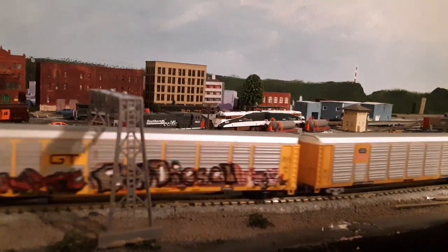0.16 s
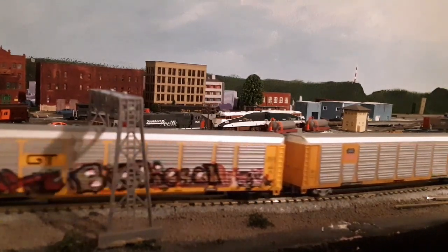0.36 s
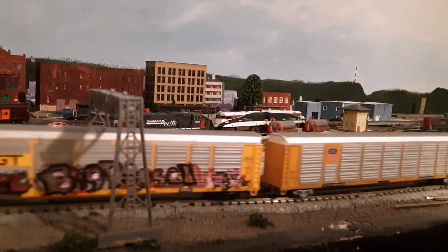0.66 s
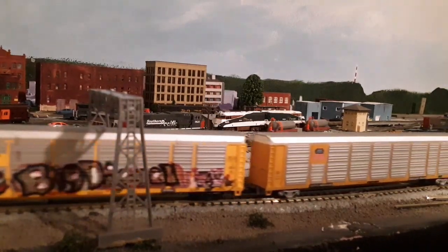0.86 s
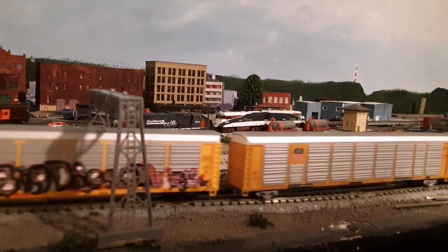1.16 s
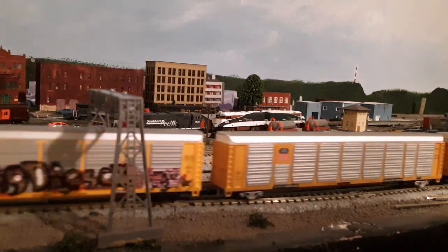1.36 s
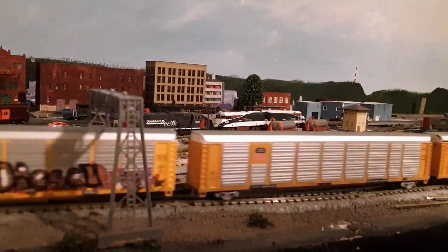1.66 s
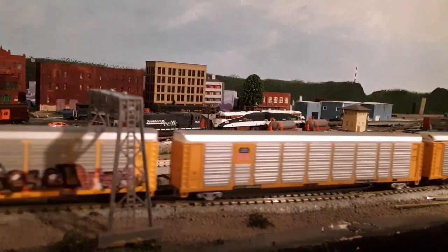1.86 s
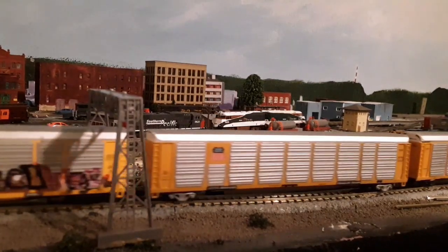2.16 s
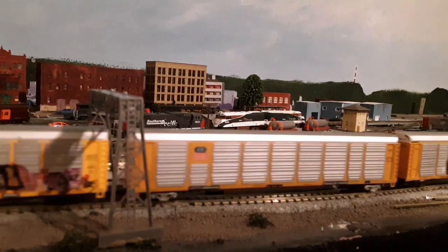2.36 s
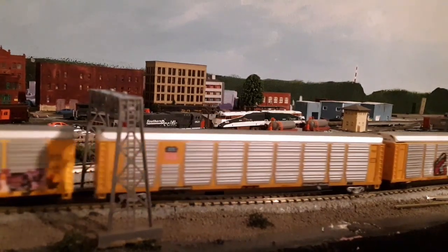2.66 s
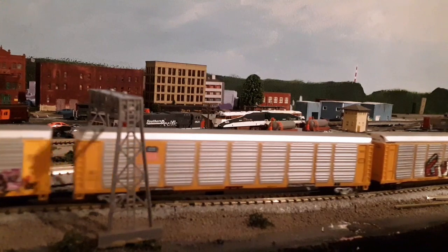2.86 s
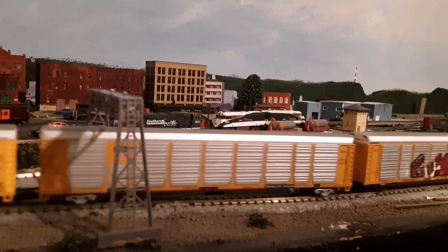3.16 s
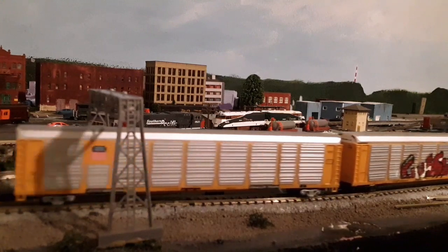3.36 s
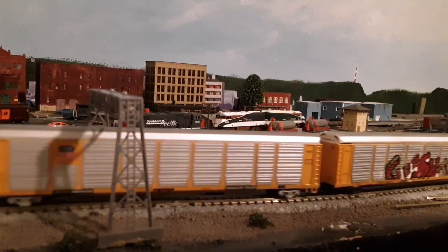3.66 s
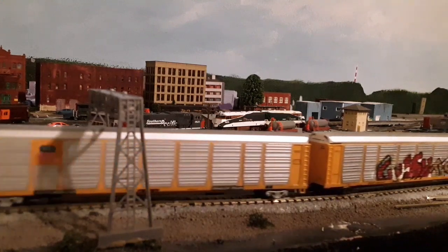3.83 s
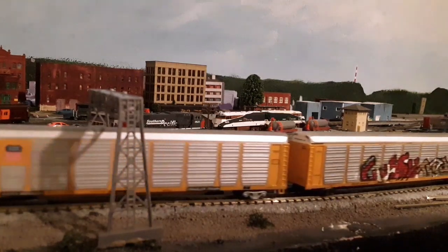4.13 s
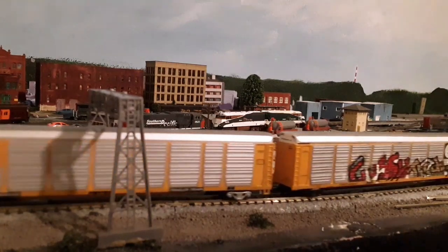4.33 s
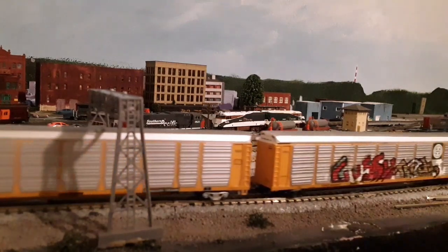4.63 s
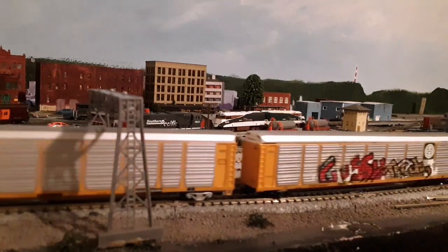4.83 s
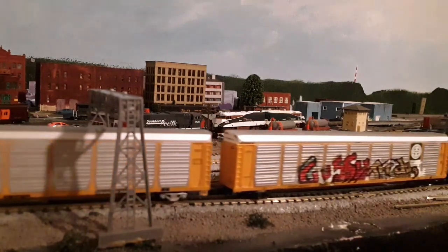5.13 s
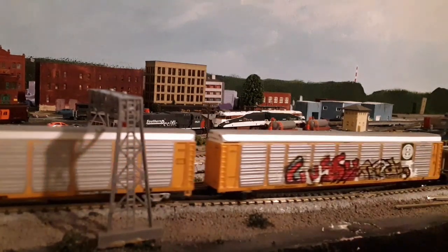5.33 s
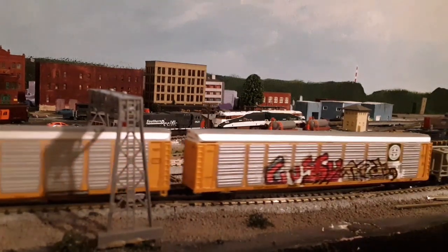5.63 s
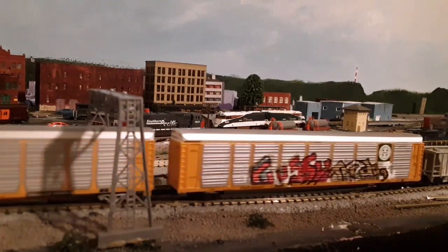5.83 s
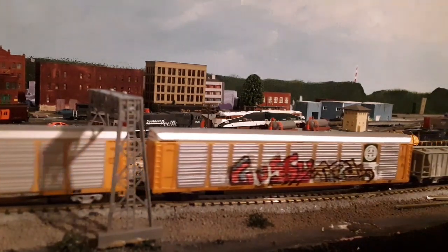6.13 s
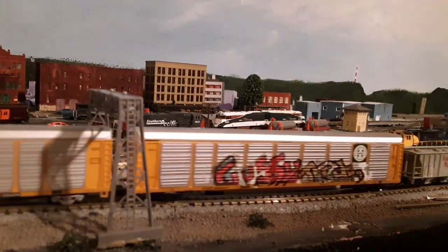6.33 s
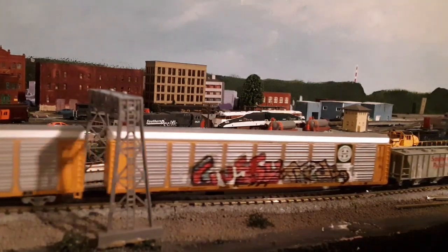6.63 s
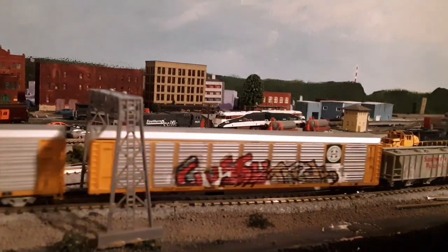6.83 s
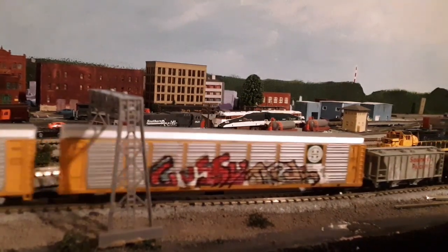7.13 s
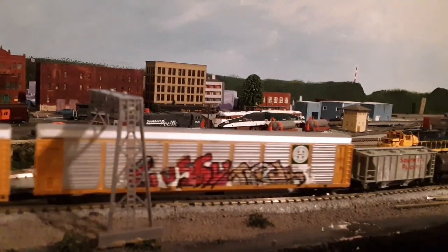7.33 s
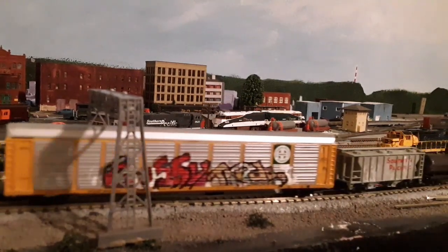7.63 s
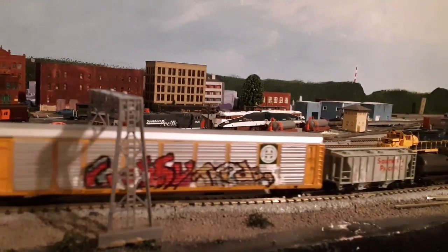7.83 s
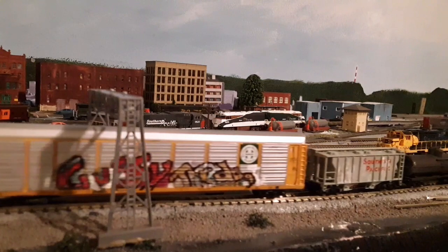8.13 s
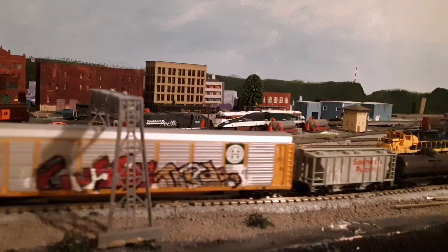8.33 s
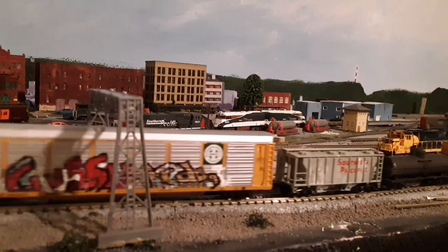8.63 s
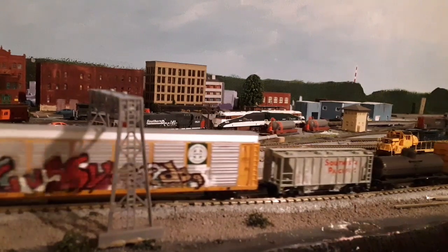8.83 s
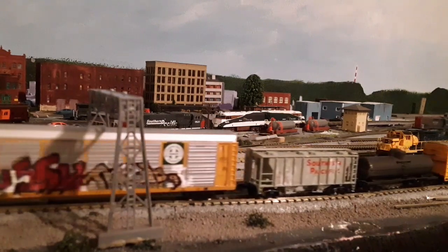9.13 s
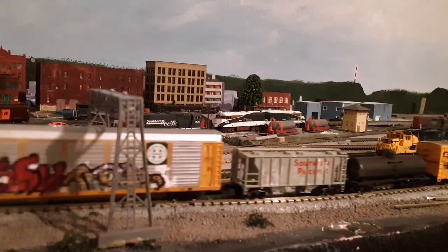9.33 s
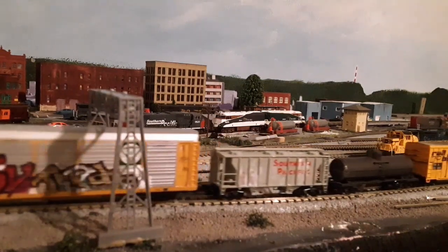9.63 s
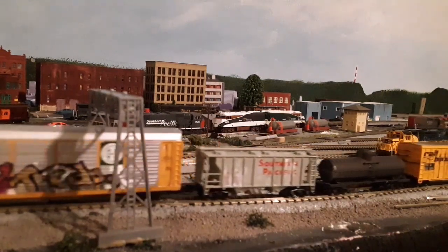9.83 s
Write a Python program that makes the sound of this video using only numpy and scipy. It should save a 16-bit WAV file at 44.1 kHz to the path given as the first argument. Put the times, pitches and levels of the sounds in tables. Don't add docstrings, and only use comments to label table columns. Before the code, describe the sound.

Small model freight cars roll by with a faint steady sizzle, light wheel ticks, and sudden sharp coupler clacks ringing briefly in a furnished room.

```python
import sys
import numpy as np
from scipy import signal
from scipy.io import wavfile
from scipy.ndimage import uniform_filter1d

SR = 44100
rng = np.random.default_rng(int(sys.argv[2]) if len(sys.argv) > 2 else 0)


def elevation(decibels):
    levels = np.asarray(decibels, float)
    return 10 ** (levels / 20)


def wav_out(sig):
    wavfile.write(sys.argv[1], SR, np.round(np.clip(np.atleast_2d(sig).T, -1, 1) * 32767).astype(np.int16))


N = 440118
SPACING = 18
EDGE_HZ = 16050
USUAL_DB = -65


def evened(x):
    return x / np.sqrt(np.mean(x ** 2) + 1e-20)


def read(points, hz):
    f, value = np.transpose(points)
    return np.interp(np.log(hz + 1), np.log(f + 1), value)


def add(mix, at, sound):
    part = mix[max(at, 0):][:len(sound)]
    part += sound[:len(part)]


def ease(t, at, span):
    return (1 + np.tanh((t - at) / span)) / 2


def circle(size=1024):
    return np.abs(np.fft.fftfreq(size, 1 / SR))


def causal(db):
    log_gain = np.log(elevation(np.maximum(db, -100)))
    return np.fft.ifft(np.exp(np.conj(signal.hilbert(log_gain)))).real


def resonate(x, hz, width):
    turn = np.exp(2j * np.pi * np.cumsum(hz * np.ones(len(x))) / SR)
    r = np.exp(-np.pi * width / SR)
    return 2 * (turn * signal.lfilter([1 - r], [1, -r], x / turn)).real


# hz, share
SHADE = [(600, 0.14), (3000, 1.5), (7000, 0.79), (15000, 1.66)]


def strikes(rows, colour):
    s, db, pan_db, treble_db, body_db, t60, room_db = np.transpose(rows)[:, :, None]
    t, hz = np.arange(2048) / SR, circle()
    near, sends = np.zeros((2, N)), np.zeros((2, N))

    chatter = rng.standard_normal((len(rows), len(t))) * elevation(-60 * t / np.maximum(t60, .002))
    chatter *= np.minimum(t / (0.0425 * t60), 1) ** 2
    chatter *= elevation(4 * np.exp(-(t / 0.0022) ** 2))

    colour_db = read(colour, hz) - 30 * (hz > EDGE_HZ)
    colour_db = colour_db + body_db * read([(2200, 1), (3000, 0)], hz)
    colour_db = colour_db + treble_db * read([(8000, 0), (9500, 1)], hz)

    def through(gains_db):
        return signal.fftconvolve(chatter, causal(gains_db), axes=1)[:, :len(t)]

    middle, click = through(colour_db), causal(colour_db)
    scale = elevation(db) / abs(middle).max(1, keepdims=True)
    shade_db = np.clip(pan_db, -4, 4) * read(SHADE, hz)
    left = scale * through(colour_db + shade_db)
    right = scale * through(colour_db - shade_db)
    energy = np.linalg.norm(middle, axis=1) / np.linalg.norm(click, axis=1)
    click *= scale * elevation(room_db) * energy[:, None]

    lag = np.clip(5 * pan_db, -SPACING, SPACING) / 2
    starts = np.round(np.hstack([s * SR - lag, s * SR + lag, s * SR])).astype(int)
    for k, (first, second, at) in enumerate(starts):
        add(near[0], first, left[k])
        add(near[1], second, right[k])
        add(sends[int(pan_db[k, 0] < 0)], at, click[k])
    return near, sends


# start_s, level_db (peak), left_right_db, treble_db, body_db
CLACKS = [(1.1583, -29, -4, -14, -5.5), (1.1798, -19, 2.5, -8.5, -14), (1.1874, -24, -1.5, 5, -3),
          (1.2062, -13.5, -1.5, -9.5, -23), (3.516, -38, -0.5, -11, -11), (3.5271, -24, 2.5, -11, -9),
          (3.5515, -14, -0.5, -6, -12), (3.5604, -36.5, -9, 2, -22), (3.5893, -11, -8, -6.5, -16.5),
          (3.5945, -17.5, -3.0, -11, -21.5), (3.6116, -19.5, 2, -28, -21)]
# start_s, level_db (peak), left_right_db, treble_db, body_db, t60_s, room_db
SNAP = (9.8893, -33, -6, 2, -2, .012, -3)
# start_s, level_db (peak), body_db
NEAR_TICKS = [(0.3611, -51, -11), (0.414, -41.5, -9), (0.4763, -48, -11), (1.5409, -46, -2),
              (1.6311, -53, -16), (1.5079, -46, -3), (1.5708, -45.5, -4), (1.7115, -51, -16),
              (2.2462, -42, -25), (2.3715, -43.5, -5), (2.4513, -42, -22), (2.6174, -46, -7),
              (2.6648, -38.5, -21), (3.3293, -40, -8), (3.4809, -36.5, -21), (3.9873, -36, -16),
              (4.115, -54, -11), (2.2093, -51, -14), (5.3038, -50, -8), (5.4505, -47, -21),
              (2.9801, -52, 1), (3.3901, -46, -6), (6.2132, -41, -5), (6.4203, -46, -8), (6.8338, -38, -15),
              (7.3122, -45.5, -16), (7.655, -51, 2), (7.8635, -47, -14), (8.908, -43, -15),
              (9.2767, -48, -23)]
# start_s, level_db (peak), body_db
FAR_TICKS = [(0.0847, -57, -14), (0.176, -49, -22), (0.6544, -52, -19), (1.7419, -54, -4),
             (2.0193, -50, -17), (2.2961, -41, -18), (2.5092, -44.5, -17), (2.592, -51, -11),
             (3.8022, -53, -7), (4.8862, -54, -10), (3.3542, -43.5, -17), (3.4475, -46, -12),
             (5.6605, -48, 1), (6.1743, -43, -32), (6.4981, -42.5, -16), (6.6672, -49, -18),
             (7.2229, -46, -7), (9.2268, -51, -19), (9.2627, -52, -17), (9.4548, -48, -14),
             (9.4723, -47, -12), (9.6803, -47, -17), (3.1362, -42, -5)]
# start_s, level_db (peak), body_db, left_right_db
GRAZES = [(0.6769, -48.5, -18, -1), (1.42, -47.5, -6, 1), (3.141, -52, -2, 0), (3.252, -39.5, -28, -2),
          (4.1529, -52.5, -24, 4), (4.227, -49, -9.5, 2.5), (5.0035, -52.5, -15, 2), (5.678, -54, -8, 2.5),
          (6.1015, -49.5, -7, 3.5), (7.9043, -52, -12, -1), (8.327, -49.5, -3, -1.5),
          (8.9614, -48, -7, 2.5)]
# hz, level_db (per Hz)
STRIKE = [(60, -67), (530, -32), (900, -11), (1430, -7.5), (1630, -4.5), (2290, -6), (2610, -3.5),
          (3950, -3), (4300, -0.5), (6330, 3), (7780, -9.5), (15000, -12.5), (16300, -26.5)]
# start_s, level_db (peak), left_right_db, t60_s
SLACK = [
    (7.3976, -24, -3, 0.021),
    (7.948, -30, -2.5, 0.017),
    (8.0798, -44, -3, 0.025),
]
# hz, level_db (per Hz)
SLACK_COLOURS = [
    [(530, -23), (900, -13.5), (1600, -14.5), (1900, -6), (2690, -5), (3150, -11.5), (3510, -3.5),
     (5610, -6.5), (6330, -1.5), (8760, -29), (11100, -16.5), (16000, -17)],
    [(530, -37), (900, -13), (1250, -14), (1620, 1.5), (2630, -9), (2860, -10), (3230, 0), (3910, -9),
     (4520, -1.5), (6480, -3.5), (7490, -14), (16000, -33)],
]


def wheels():
    near_pan_db, far_pan_db, tick_t60_s, graze_t60_s = 5.5, -1.5, 0.013, 0.018
    clacks = [(s, db - 0.5, pan, top + 11, body + 15, 0.025, 4.0) for s, db, pan, top, body in CLACKS]
    clacks += [SNAP]

    when, side, size, body = rng.random((45, 4)).T
    faint = np.transpose([when * (N / SR - .1), -56 + 2.5 * (2 * size - 1), -12 + 16 * (body - .5)])
    joints = [(NEAR_TICKS, near_pan_db), (FAR_TICKS, far_pan_db),
              (faint[side < .75], near_pan_db), (faint[side >= .75], far_pan_db)]
    ticks = []
    for rows, pan in joints:
        for s, db, body in rows:
            room_db = -2.5 + .5 * (-38 - db)
            ticks.append((s, db, pan, -7.0, body + 14, tick_t60_s, room_db))
    ticks += [(s, db, pan, -7.0, body + 14, graze_t60_s, 7.5) for s, db, body, pan in GRAZES]

    slack = [(s, db + 3.0, pan, 0, 0, t60, 5.5) for s, db, pan, t60 in SLACK]
    groups = [(clacks + ticks, STRIKE), (slack[:1], SLACK_COLOURS[0]), (slack[1:], SLACK_COLOURS[1])]
    near, sends = sum(np.array(strikes(*group)) for group in groups)
    return near + room(sends)


# hz, t60_s
ROOM = [(200, 0.44), (530, 0.47), (1390, 0.25), (3680, 0.21), (9700, 0.18)]
# hz, left_right_db
LEAN_ROOM = [(60, 0), (180, 1.5), (550, -3), (1650, 1), (4970, 2), (15000, 0.5)]


def room(sends):
    size = SR // 2
    taps, early = np.zeros((4, size)), np.exp(-np.arange(size) / SR / 0.029)
    grid = np.arange(120, size - 12, 12)
    at = grid + rng.integers(0, 12, (4, len(grid)))
    signs = rng.choice([-1., 1.], at.shape)
    np.put_along_axis(taps, at, signs * elevation(2.4 * rng.standard_normal(at.shape)), 1)
    clumps = evened(uniform_filter1d(rng.standard_normal((4, size)), size=100))
    taps *= elevation((1.0 + 3.8 * clumps) * early)

    hz, t, z = signal.stft(taps, SR, nperseg=128)
    z = z * elevation(-60 * t / (1.25 * read(ROOM, hz))[:, None])
    lean_db = read(LEAN_ROOM, hz) / 2
    sides = elevation([0 * hz + 1.7, 0 * hz - 1.5, lean_db, -lean_db])[:, :, None]
    plain = signal.istft(z, SR, nperseg=128)[1]
    tails = signal.istft(z * sides, SR, nperseg=128)[1] / np.linalg.norm(plain, axis=1)[:, None]
    wet = signal.fftconvolve(np.repeat(sends, 2, axis=0), tails, axes=1)[:, :N]
    return wet[:2] + wet[2:]


# start_s, level_db
ROLL = [(0.0, -62), (0.55, -65), (1.36, -61), (1.6, -65.5), (2.08, -63.5), (2.61, -63), (3.47, -61.5),
        (3.81, -63), (4.0, -66.5), (4.6, -70), (4.95, -64), (5.42, -68.5), (6.34, -65), (6.78, -65.5),
        (7.42, -66), (8.09, -64.5), (8.87, -63.5), (9.98, -63.5)]


def roll_db(t):
    s, db = np.transpose(ROLL)
    return np.interp(t, s, db)


# hz, level_db (per Hz)
SIZZLE = [(530, -27), (900, -27), (1090, -6.5), (1500, -4), (1900, 3), (2340, -1.5), (3380, -2), (3720, -3),
          (5500, -6), (6610, -2.5), (8040, -27.5), (10500, -28), (12000, -31), (15600, -38), (22000, -120)]
# pitch_hz, width_hz, first_db, last_db
RIDGES = [(1110, 83, -1, 5.5), (1940, 190, 3, -2), (2770, 330, 1, 4), (3290, 220, 3.5, 0.5)]
# hz, level_db (per Hz)
BOARD = [(130, -27), (220, -8.5), (439, -6.5), (570, -5), (820, -6), (1300, -4), (1690, -15), (2860, -120)]
# hz, level_db (per Hz)
RUMBLE = [(15, -47), (25, -12), (49, -17), (86, -5.5), (108, 0.5), (129, 0), (146, -2.5), (184, -1.5),
          (300, -11.5), (390, -52), (660, -120)]
# hz, left_right_db
LEAN_ROLL = [(60, -2), (180, 3), (550, 4.0), (1650, 2.5), (4970, 5.5), (15000, -2)]


def rolling():
    t = np.arange(N) / SR
    sizzle_db = roll_db(t)
    above_db = sizzle_db - USUAL_DB
    heavy = ease(t, 4.6, .3)
    board_db = -73 + 0.5 * above_db + 3.5 * heavy
    rumble_db = -73 + 0.54 * above_db + 2 * heavy

    def tilt_db(u):
        return -.4 + .1 * (roll_db(u) - USUAL_DB)

    sizzle = noise(SIZZLE, sizzle_db + 4.0, 0.13, SPACING, 1.58, 1.0, tilt_db, RIDGES)
    board = noise(BOARD, board_db, 0.53, 12.6, 1.6, 1.8, size=1024)
    rumble = noise(RUMBLE, rumble_db, 0.69, 3.1, 0.68, 0.6, size=2048)
    return sizzle + board + rumble + grit(sizzle_db - 17.0)


def noise(spectrum, level_db, same, lag, patchy_db, flicker_db, tilt_db=None, ridges=(), size=512):
    hop = size // 4
    frames, hz = N // hop + 5, np.fft.rfftfreq(size, 1 / SR)[:, None]
    t = np.arange(frames) * hop / SR
    a, b, c, d, patches = rng.standard_normal((frames, len(hz), 5)).T
    patches = uniform_filter1d(uniform_filter1d(patches, size=9, axis=0), size=15, axis=1)
    flicker = evened(uniform_filter1d(rng.standard_normal(frames), size=5))
    left = a + 1j * b
    late = left * np.exp(-2j * np.pi * hz * lag / SR)
    right = same * late + np.sqrt(1 - same ** 2) * (c + 1j * d)

    shape_db = read(spectrum, hz) + patchy_db * evened(patches) + flicker_db * flicker
    if tilt_db:
        shape_db = shape_db + tilt_db(t) * np.log2((hz + 1) / 2500)
    for f, width, first_db, last_db in ridges:
        swell = 1 + 0.34 * evened(uniform_filter1d(rng.standard_normal(frames), size=120))
        ridge_db = np.linspace(first_db, last_db, frames) * swell
        shape_db = shape_db + ridge_db / (1 + (2 * (hz - f) / width) ** 2)

    lean_db = read(LEAN_ROLL, hz) / 2
    sides = np.array([left * elevation(lean_db), right * elevation(-lean_db)])
    z = sides * elevation(shape_db) * (hz < EDGE_HZ)
    out = signal.istft(z, nperseg=size, noverlap=size - hop)[1][:, :N]
    return evened(out) * elevation(level_db)


def grit(level_db):
    size = elevation(4.5 * np.minimum(rng.exponential(1, (2, N)), 4)) * (rng.random((2, N)) < 300 / SR)
    t, hz = np.arange(300) / SR, circle()
    grain = rng.standard_normal((2, len(t))) * elevation(-60 * t / .006)
    grains = signal.oaconvolve(size, grain, axes=1)[:, :N]
    taps = causal(read(SIZZLE, hz) + 2.3 * np.log2((hz + 1) / 2500))
    left, right = evened(signal.oaconvolve(grains, taps[None], axes=1)[:, :N])
    late_left, late_right = np.roll(left, SPACING), np.roll(right, SPACING)
    return elevation(level_db) * np.array([left + 0.297 * late_right, 0.18 * late_left + .5 * right])


# start_s, level_db (peak), pitch_hz, width_hz, t60_s
KNOCKS = [(1.16, -56, 500, 600, 0.22), (1.181, -47, 500, 600, 0.36), (1.208, -43, 268, 298, 0.28),
          (1.21, -43.5, 755, 500, 0.24), (3.555, -44, 770, 510, 0.25), (3.592, -37.5, 690, 610, 0.27),
          (3.605, -42, 300, 252, 0.23), (5.7, -62.5, 174, 30, 0.48), (7.403, -42, 160, 40, 0.23),
          (7.405, -62, 40, 60, .3), (7.41, -46, 310, 60, 0.29), (7.41, -42.5, 572, 120, 0.16),
          (7.512, -41, 466, 130, 0.095), (7.54, -54, 486, 130, 0.25), (7.841, -54.5, 443, 110, 0.22),
          (7.873, -56, 420, 120, 0.14), (7.96, -60, 337, 80, 0.17), (8.35, -61, 470, 130, 0.16),
          (3.25, -60, 360, 90, .25), (8.1, -62, 450, 300, .3), (8.65, -62, 230, 60, .4)]


def knocks():
    out, t = np.zeros((2, N)), np.arange(SR // 3) / SR
    for s, db, hz, width, t60 in KNOCKS:
        shape = elevation(db - 60 * t / t60) * np.minimum(t / 0.0087, 1)
        main, other = (evened(resonate(resonate(v, hz, width), hz, width))
                       for v in rng.standard_normal((2, len(t))))
        apart = min(hz / 550, 1.3)
        add(out[0], round(s * SR), elevation(-0.6) * shape * (0.82 * main + 0.62 * apart * other))
        add(out[1], round(s * SR), elevation(-0.3) * shape * (0.65 * main - 0.4 * apart * other))
    return out


def motor():
    t = np.arange(N) / SR
    pitch_hz, on_s, top_s, off_s = 156, 8.05, 8.82, 9.07
    line = .8 * np.sqrt(2) * np.sin(2 * np.pi * pitch_hz * t)
    line += .25 * evened(resonate(rng.standard_normal(N), pitch_hz, 8.))
    load_db = -63 - np.maximum(5.5 * (top_s - t), 10 * (t - top_s))
    return line * elevation(load_db) * ease(t, on_s, .05) * ease(-t, -off_s, .07)


def boom():
    t = np.arange(N) / SR
    beat_s, full_s, off_s, fade_s = .85, 0.92, 3.94, 0.1
    mode = evened(resonate(rng.standard_normal(N), 108.0, 23.8))
    beat_db = (np.cos(2 * np.pi * (t - full_s) / beat_s) - 1) / 2
    return mode * elevation(-70 + beat_db + [[-2.4], [-3.8]]) * ease(-t, -off_s, fade_s)


def scene():
    return wheels() + rolling() + knocks() + motor() + boom()


# hz, left_right_db
PORTS = [(2500, 0.5), (3800, 0.5), (5200, -4), (6500, -6.5), (8000, 0)]


def ports(dry):
    step_db = read(PORTS, circle()) / 2
    taps = causal(np.array([step_db, -step_db]))[:, :256]
    return signal.oaconvolve(dry, taps, axes=1)[:, :N]


# hz, level_db (per Hz)
HISS = [(4410, -34), (7500, -4), (9350, -7), (15100, -6), (16000, -15), (16300, -14.5)]


def hiss():
    swell_db = roll_db(np.arange(N) / SR) + 67.0
    return noise(HISS, -78 + 0.51 * swell_db, 0, 0, 0.47, 0.27)


def roll_off(x):
    return signal.sosfilt(signal.butter(12, 17000, fs=SR, output="sos"), x)


def record(dry):
    return roll_off(ports(dry) + hiss())


dry = scene()
out = record(dry)
wav_out(out)
```